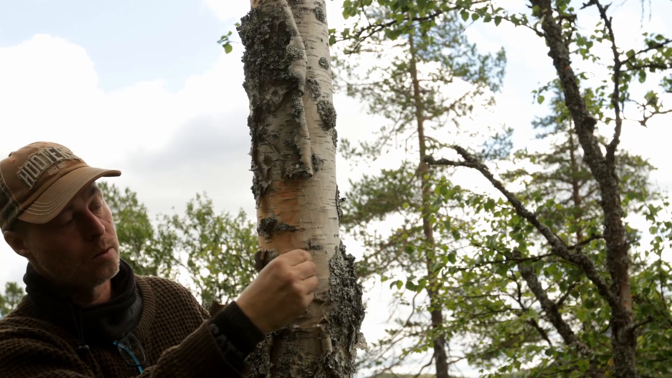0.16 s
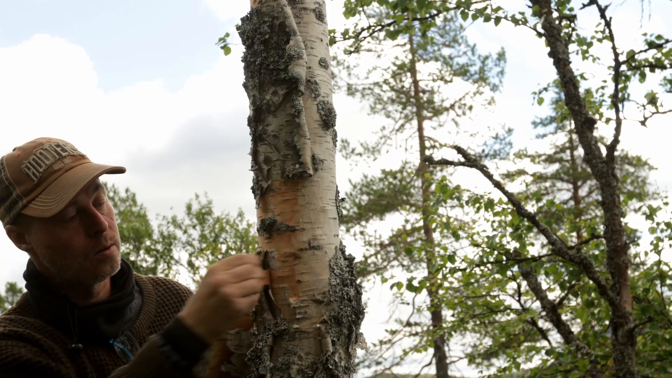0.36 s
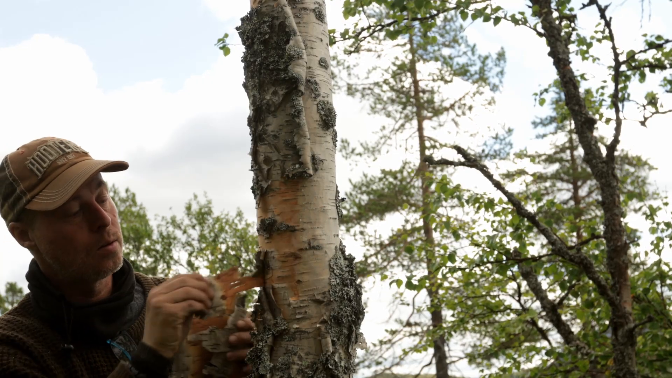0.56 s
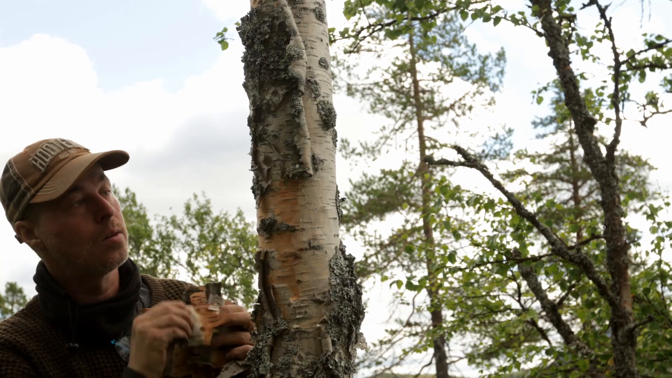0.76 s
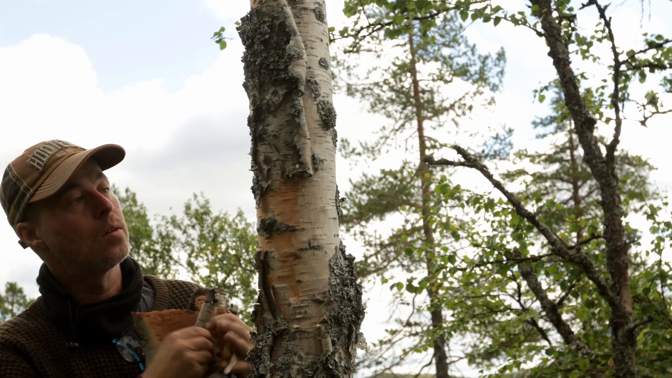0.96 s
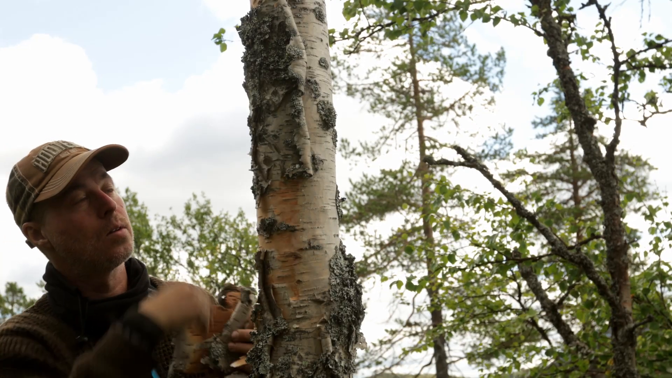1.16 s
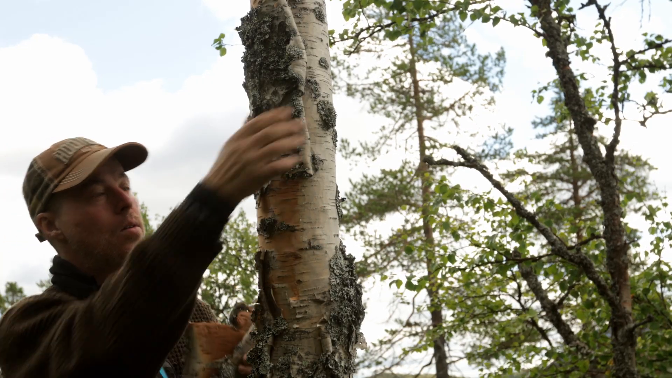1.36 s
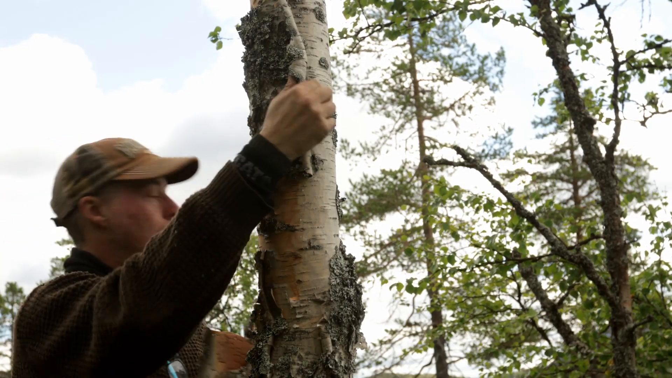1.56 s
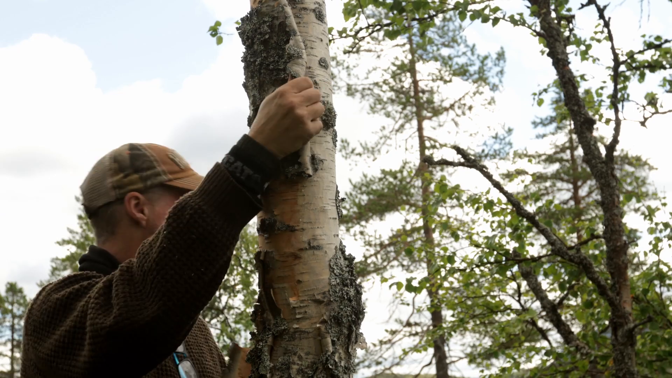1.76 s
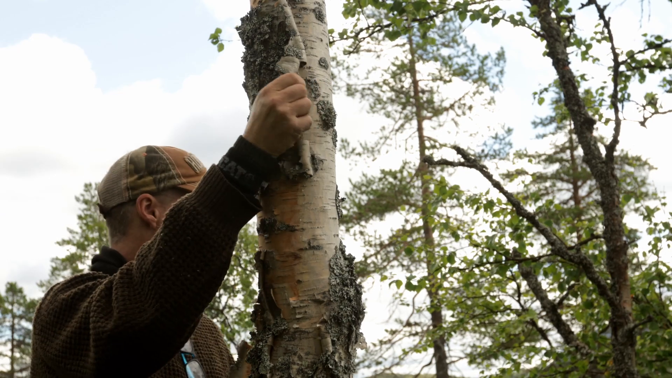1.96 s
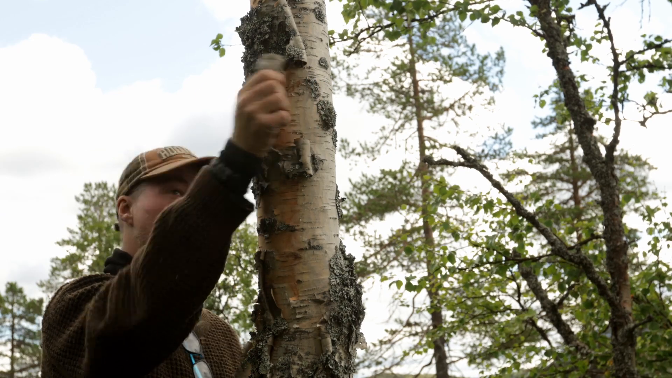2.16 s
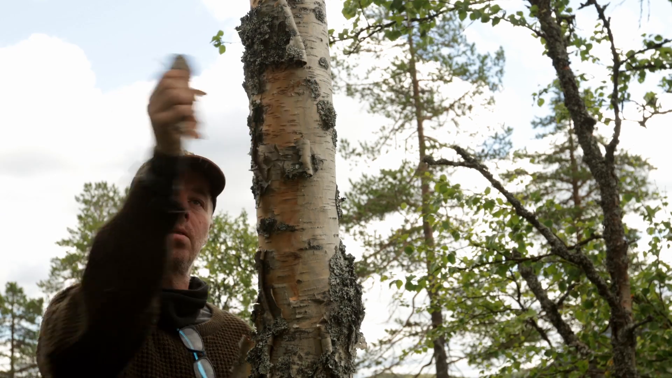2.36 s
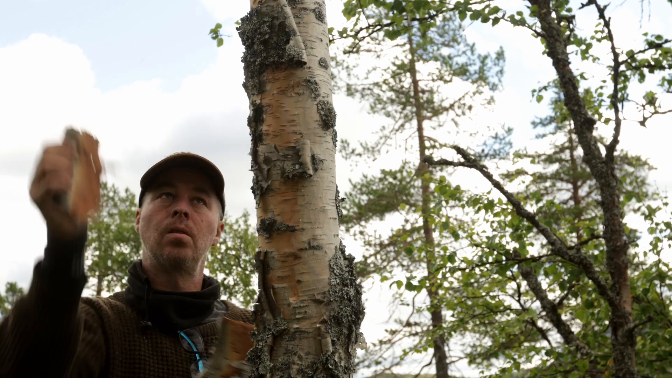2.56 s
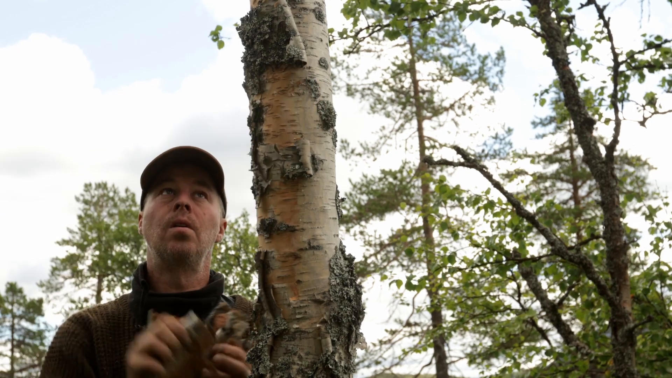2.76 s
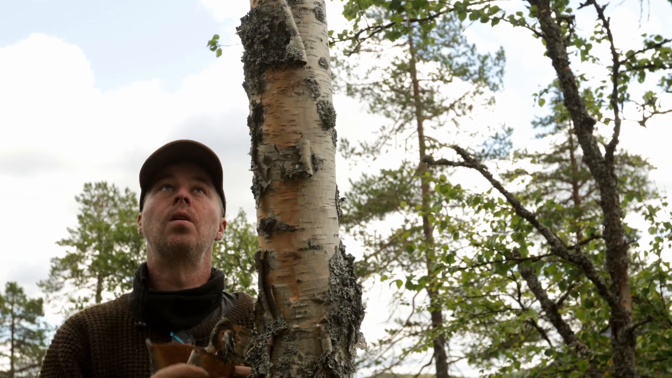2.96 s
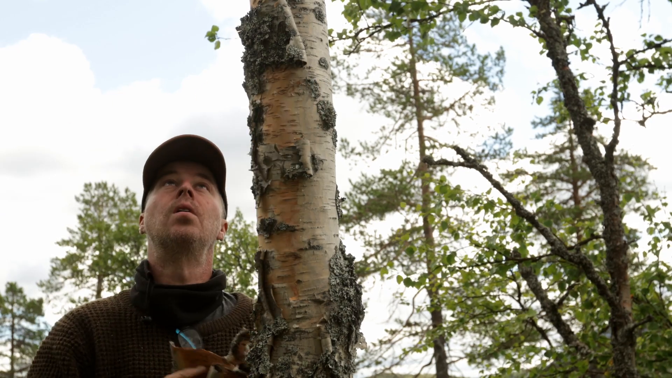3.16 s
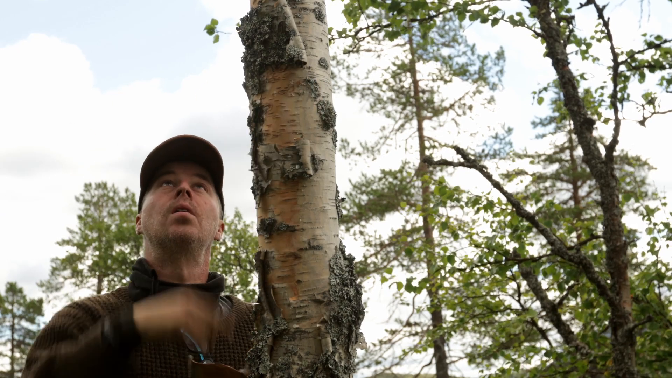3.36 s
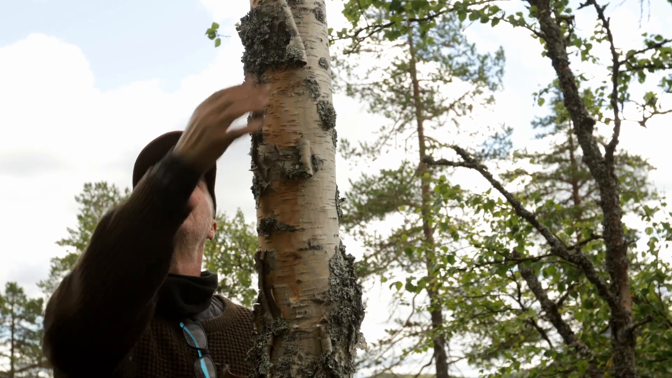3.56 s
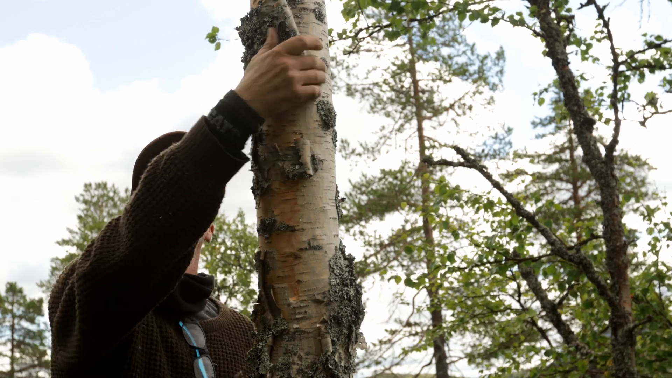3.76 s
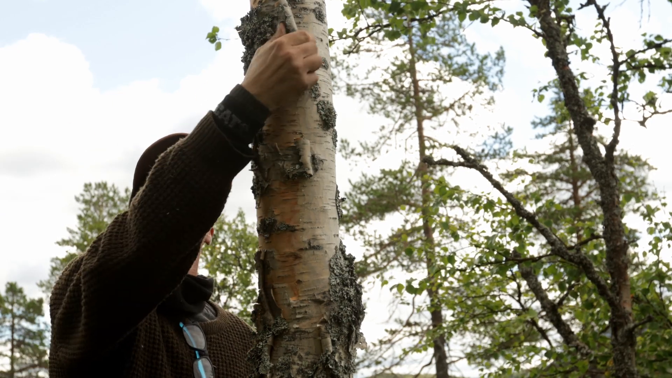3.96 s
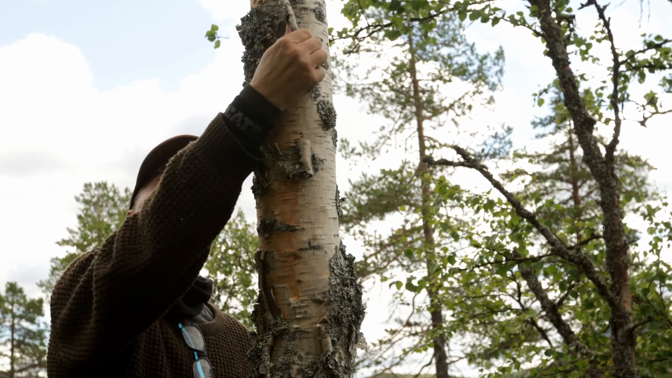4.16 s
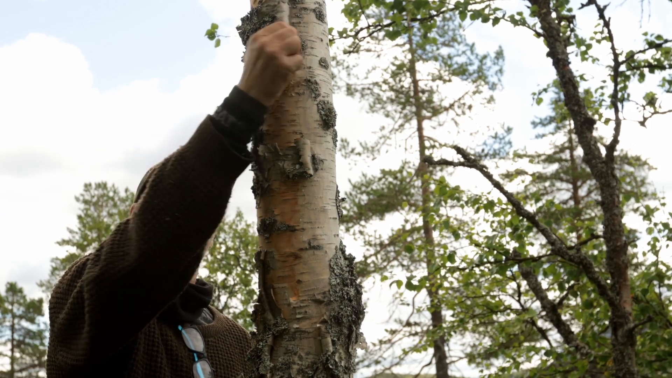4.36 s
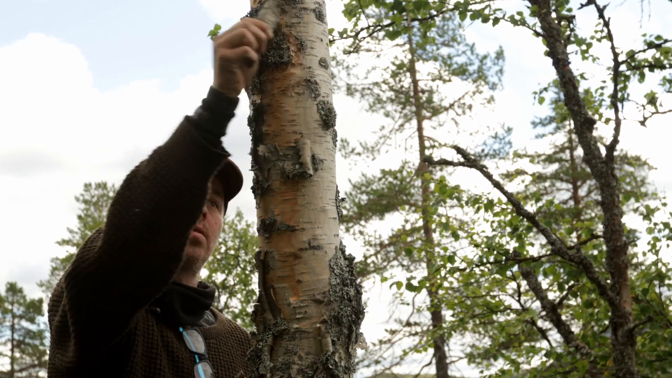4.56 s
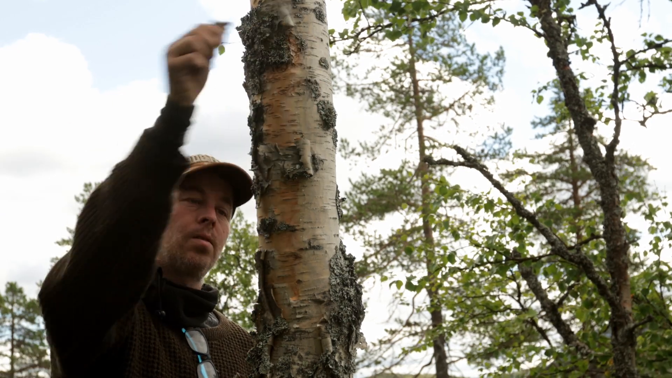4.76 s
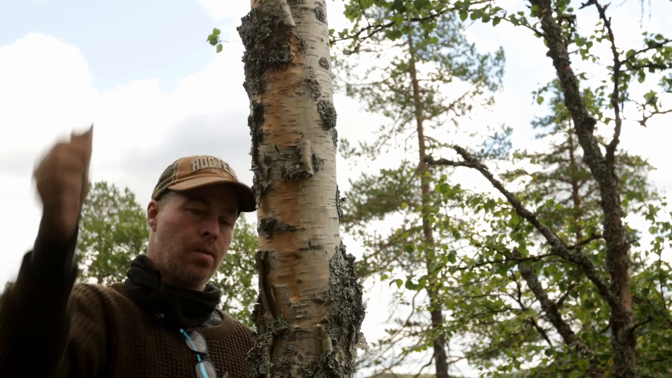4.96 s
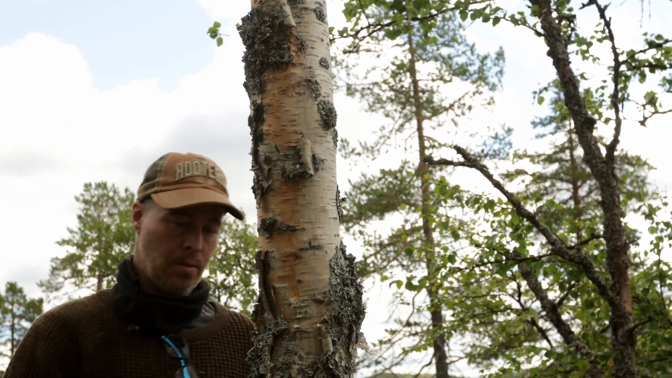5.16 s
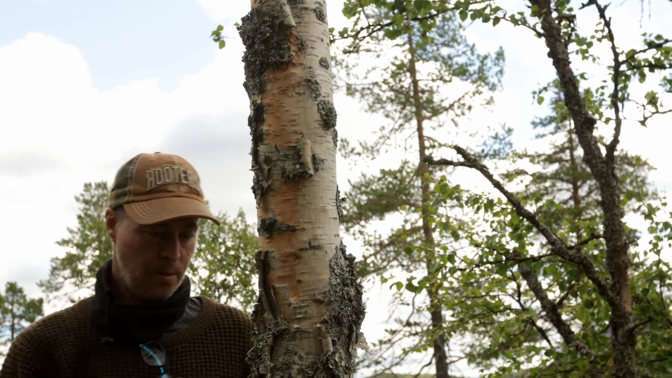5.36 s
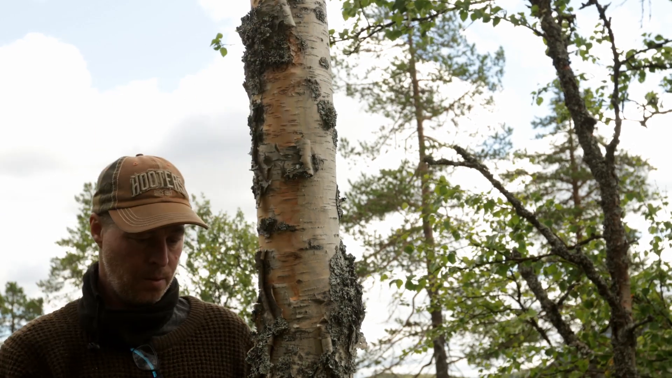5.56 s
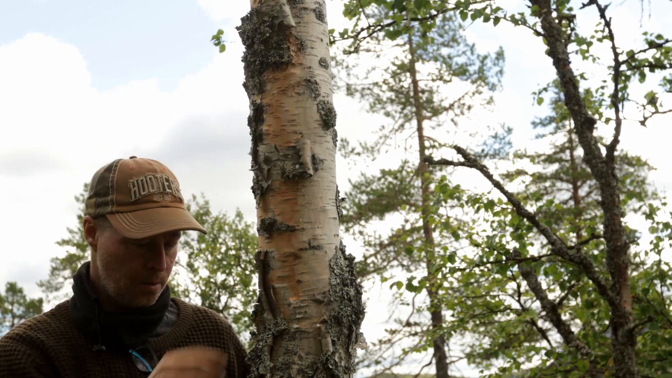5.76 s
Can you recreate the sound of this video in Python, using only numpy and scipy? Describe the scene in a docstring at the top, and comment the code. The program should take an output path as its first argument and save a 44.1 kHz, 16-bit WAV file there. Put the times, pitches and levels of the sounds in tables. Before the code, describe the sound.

Close up outdoors, hands peel dry birch bark. A dense crackling rip opens, thins to rustling, then harsh tearing bursts hit around two seconds. Quiet handling follows, with another strong tear after four seconds, then only soft rustles. Low wind buffets the microphone; the loudest snaps overload slightly.

```python
"""Peeling dry birch bark

Bark is peeled off a trunk by hand in a forest. Breaking fibre bonds give bursts of sharp snaps, each a tick,
a noisy crack, a damped ring and a thud; finger strokes rustle as clumped grains and friction hiss shaped by
the sheet. Filtered noise gives the light wind rumbling on the microphone and the hiss of far leaves. The
loudest snaps overload the recorder."""
import sys
import numpy as np
from scipy import signal
from scipy.fft import rfft, irfft, next_fast_len
from scipy.io import wavfile
from scipy.ndimage import uniform_filter1d, map_coordinates

SR = 44100
rng = np.random.default_rng(int(sys.argv[2]) if len(sys.argv) > 2 else 0)


def file_out(sig):
    """Save sig as 16-bit WAV at sys.argv[1]."""
    # one column per channel
    cols = np.atleast_2d(sig).T
    # limit, then scale
    lim = np.clip(cols, -1, 1)
    pcm = np.round(lim * 32767).astype(np.int16)
    wavfile.write(sys.argv[1], SR, pcm)


N = 256220

# Wind rumble: (time [s], relative level [dB])
WIND_LEVEL = [(0,-52.5),(.37,-53),(.5,-61),(.86,-54),(1.12,-57.5),(1.57,-48),(1.75,-48),(1.91,-53.5),(2.07,-49.5),(2.46,-52),(3.06,-44),(3.2,-50.5),(3.5,-50.5),(3.75,-59),(4.06,-50.5),(4.37,-47.5),(5.13,-45.5),(5.7,-45),(5.81,-50)]
# Spectrum of the wind rumble: (frequency [Hz], gain [dB])
RUMBLE_SPECTRUM = [(12, -45), (20, -13), (83, 0.5), (103, 1.5), (207, -6), (348, -17.5), (386, -20),
                   (441, -19.5), (700, -24.5), (910, -66), (1540, -120)]
# Spectrum of the far leaves: (frequency [Hz], gain [dB])
LEAF_SPECTRUM = [(180, -48), (300, -16.5), (337, -2.5), (470, -9.5), (555, -9), (842, -10), (1030, -11),
                 (1610, -25), (3700, -27), (16000, -54)]
# Finger strokes on the sheet: (start [s], length [s], first relative level [dB], last relative level [dB],
# relative brightness [dB], relative hollow scrape [dB])
FINGER_STROKES = [(0.018,0.062,-49,-48,-11,-7.5),(0.097,.1,-48,-41,-7,-17),(0.203,0.084,-46,-50.5,-0.5,-9),(0.299,0.075,-41,-34.5,-3,-7.5),(.38,0.081,-47,-54,-4.5,-12),
                  (0.453,0.088,-41.5,-38,-1.5,-5.5),(0.557,0.089,-49,-43,-0.5,-11),(0.642,0.11,-32.5,-45.5,0,-10),(0.769,0.055,-47,-45.5,-4.5,-3),(0.849,0.17,-48,-37.5,-1,-1.5),
                  (1.032,0.076,-44,-47.5,-1,-2.5),(1.115,0.097,-43,-46,-2.5,-2.5),(1.179,0.029,-42.5,-36.5,-4,-4),(1.217,0.1,-58,-65,-6,-4),(1.472,0.055,-59,-66,-4,-14),(1.545,0.033,-42.5,-46.5,0,-15),(1.582,0.072,-44,-51,2,1),(1.659,0.048,-47,-57.5,-3,1.5),(1.71,.08,-55,-57,-5,-2),
                  (1.78,0.12,-50,-44,0.5,1),(1.916,0.064,-40,-43,-2,-8),(1.993,0.2,-49.5,-49.5,4,-2.5),(2.2,0.05,-36.5,-31,2,-1.5),(2.261,0.018,-39,-44.5,4.5,-14),
                  (2.297,0.056,-42,-49.5,5.5,-18),(2.368,0.016,-34,-47,4,-4),(2.4,0.14,-61,-66,-3.5,-5),(2.54,0.12,-61,-59,-3,-7),(2.678,0.068,-55,-57,-2,-7),(2.802,0.089,-60,-56,-5,-6),(2.878,0.049,-37.5,-43,-2.5,0),(2.932,0.069,-44,-46.5,-1.5,-5.5),(3.008,0.1,-44,-37.5,-6,-6.5),
                  (3.134,0.028,-43,-37.5,-7,-4.5),(3.17,.06,-51,-53.5,-5,-9),(3.233,0.13,-48,-49.5,-5,-4),(3.373,0.026,-49.5,-38.5,-3.5,-10),(3.434,0.32,-65,-65.5,-3,-4),(3.769,0.062,-52,-45,5.5,-3),
                  (3.857,0.04,-52.5,-45.5,-1.5,1),(3.941,0.084,-57.5,-46,-2.5,0.5),(4.045,0.13,-63,-49,-0.5,0),(4.192,.12,-55,-42.5,-1.5,-3),(4.297,0.052,-42,-49.5,5,-12),
                  (4.363,0.098,-55,-47,1,-6),(4.47,.05,-63,-63,2,-10),(4.518,0.055,-52,-48,-1,-12),(4.584,0.099,-41,-43,1.5,-20),(4.702,0.06,-49,-42.5,3.5,-14),(4.777,0.032,-35.5,-43.5,3,-8),(4.818,.04,-58,-57,3.5,-11),
                  (4.988,.03,-52.5,-54,-2,-1.5),(5.031,0.076,-49,-48,-1.5,-9),(5.148,0.12,-55.5,-57.5,-2.5,-7.5),(5.297,0.072,-59,-56,-6.5,-6),(5.388,0.041,-52.5,-46,-5,-8),(5.439,0.12,-51.5,-45,-2,-10.5),(5.57,0.064,-49,-52.5,-4,-10),(5.631,0.077,-50,-48.5,-3.5,-10.5),(5.702,0.12,-54.5,-64.5,-2,-6)]
# Spectrum of the rustling sheet: (frequency [Hz], gain [dB])
SHEET_SPECTRUM = [(240, -30.5), (400, -5), (666, -8), (777, -3), (839, -6.5), (1420, -15.5), (2120, -7),
                  (2510, -8.5), (3020, -6), (3580, -3), (3810, 0.5), (4380, -12), (13500, -23),
                  (15300, -22.5), (16000, -14)]
# Clear snaps: (time [s], relative level [dB], pitch of the freed patch [Hz], relative tick level [dB],
# relative thud level [dB])
BARK_SNAPS = [(.04,-28,2950,-28,-13),(.1102,-27,2680,-25,-24),(.1516,-31,3120,-18,-32),(.183,-23,3180,-17,-35),
              (.229,-19,1140,1.5,-17),(.2566,-38,3380,9,-28),(.2857,-32,3060,4,-31),(.2975,-25.5,2730,8,-29),(.303,-11.5,3520,0,-40),(.306,-17,3230,3,-31),(.3094,-17,3420,-7,-29),(.3207,-22,2800,-9,-32),
              (.3292,-19.5,2680,4,-15),(.3375,-11.5,3170,-3.5,-17),(.3543,-23,2340,4,-19),(.3603,-21.5,1240,-10,-13),(.369,-17.5,3800,-2,-15),
              (.3837,-33,3920,11,-33),(.3977,-36,4180,8,-20.5),(.4312,-40,3320,5,-21.5),(.4552,-30.5,3200,12,-13.5),(.4617,-29,2930,-18,-4.5),
              (.4658,-23.5,2730,-16,-8),(.4707,-20,1980,0,-15),(.481,-24,1290,8,-6),(.4918,-9.5,3580,-7,-14),(.4962,-16,3370,-6,-35),
              (.4988,-11,3380,-4,-13),(.5102,-10.5,3360,10,-18),(.5215,-3.5,3900,5.5,-16),(.5289,-12,4000,-16,-18),(.5327,-9.5,1940,-3,-9.5),
              (.5449,-23,3140,-1,-20),(.6391,-15.5,2030,7,-18.5),(.6445,-23,3700,1,-6),(.6476,-21.5,1950,-13,-7),(.6539,-16,3340,4.5,-13),
              (.6608,-24,3120,5,-14),(.6763,-17.5,2080,5,-8),(.7296,-26,2440,0,-4.5),(.7338,-23.5,1500,-20,-7),(.754,-25.5,3290,11,-7),
              (.7993,-26,3950,2,-9),(.8202,-28.5,1330,-17,-8),(.8406,-25.5,1350,-5.5,-15),(.856,-28,2450,-18,-29),(.8905,-26,3630,-8,-7.5),
              (.9014,-26.5,3760,1.5,-29),(.929,-29,3700,-1,-26),(.9545,-24.5,2520,3,-28),(.967,-19.5,2620,-13,-23),(.976,-20,2720,-1,-17),(.9867,-20,2690,0,-17.5),(1.0009,-12,1730,-13,-17),
              (1.0313,-23,3120,-17,-20),(1.106,-21,1960,-4.5,-16),(1.1983,-16.5,2300,-3.5,-15.5),(1.2447,-40,2300,-14,-7),(1.2956,-39,2780,-5,-25),(1.4767,-45,3400,10,-24),(1.5459,-26,3480,-6,-30),(1.6093,-32,3540,-9,-28),(1.7504,-40,1590,6,-19),(1.7578,-34,2950,3,-28),
              (1.799,-24.5,1470,-16,-37),(1.8162,-18.5,2840,-7,-39),(1.8468,-25,2780,-19,-28),(1.8662,-17,3030,-4.5,-33),(1.8825,-23,2850,-8,-22),
              (1.911,-22,2670,-2,-30),(1.9177,4,1500,-9.5,-41),(1.92,-14,1550,-18,-8),(1.9315,0,1850,-18,-34),(1.9354,-11,2000,-16,-41),
              (1.9506,-19,1570,-7,-18),(1.9983,-5.5,1880,-23,-44),(2.016,-5,2100,-2.5,-47),(2.0173,-11,1560,-17,-33),(2.0432,-8,2780,-0.5,-30),
              (2.086,-6.5,1380,-8.5,-28),(2.0907,-21,1610,-18,-38),(2.0992,-10,1500,-27,-41),(2.1131,-13.5,3500,6,-19),(2.1269,-22,3060,8,-35),
              (2.1638,-20.5,3250,11,-15),(2.2014,-15,1100,-7,-22),(2.2045,-9,1540,-9,-15),(2.2067,-11.5,3000,8,-22),(2.2113,-16,3300,2,-12),
              (2.2188,-5.5,3220,-18,-29),(2.2315,-9,2850,-13,-15),(2.2366,-16,1550,-2,-6.5),(2.2412,-14,3400,-13,-12),(2.2448,-20,3100,-6,-14),
              (2.261,-9,3770,-3,-18),(2.2714,-21,3210,-4,-5),(2.2937,3,3630,-9,-42),(2.296,-9.5,2720,-9,-38),(2.302,-19,3340,3,-12.5),
              (2.306,-24,3810,3,-35.5),(2.3142,-6.5,3710,-2,-30),(2.3185,-21,3510,5.5,-22),(2.3261,-18,3270,2,-43),(2.332,-5.5,3080,-9,-41),
              (2.3377,-13.5,3700,6.5,-21),(2.3625,3.5,2060,-5,-21),(2.3662,-7.5,3340,-7,-10.5),(2.537,-29,3500,-25,-28),(2.7223,-37,2820,-16,-21),(2.7412,-44,2070,6,-23),(2.8102,-40,3500,-16,-21),(3.0487,-29,3570,-17,-20),(3.1103,-23.5,3400,-10,-6.5),
              (3.1413,-22.5,3530,-18,-11),(3.2356,-24,2190,-4,-24),(3.2626,-32,3790,-1,-22),(3.279,-26,3240,-9,-15),(3.297,-22,2520,-5.5,-10.5),(3.5478,-39,3700,-8,-13.5),
              (3.7799,-29,3430,6,-6),(3.7968,-21,3400,-8,-13),(3.8171,-13,3580,-8,-29),(3.879,-29,3100,-14,-23),(4.1473,-35.5,1250,5,-26),(4.2008,-34,3320,-4,-21),(4.2125,-32,3350,-13,-14),(4.237,-27,1680,-18,-20),
              (4.261,-26,3730,3,-30),(4.2769,-20,3660,-2.5,-40),(4.2845,-23,1640,-20,-31),(4.2995,-29,3470,-6,-28),(4.303,-0.5,1550,-13,-23),
              (4.307,1.5,3410,-14,-29),(4.3104,-16,1550,-16,-22),(4.3172,-28,2510,-9,-22),(4.344,-26.5,2320,0,-32),(4.3661,-28,3250,0,-12),
              (4.39,-37,3560,-14,-20),(4.4175,-30.5,2510,6,-23),(4.4484,-22,2080,-2.5,-30),(4.4658,-30.5,3120,8,-24),(4.5058,-40,3920,9,-15),(4.5241,-34,3400,0,-18),(4.5444,-18,3630,-4,-22),(4.5813,-9,2730,-22,-37),
              (4.6003,-7,3100,-17,-30),(4.607,-20,3730,3,-35),(4.6252,-6.5,3750,-4,-26),(4.6326,-14,3450,-3,-42),(4.6425,-11,3460,6,-16),
              (4.6555,-15.5,3770,-5,-31),(4.6622,-16,3640,-1,-17.5),(4.6741,-21,3640,2,-31),(4.6993,-9.5,3330,3.5,-15.5),(4.7266,-29,3700,-7,-7),
              (4.7699,-19,3470,9,-35),(4.7793,-8.5,2360,.5,-13),(4.7815,-19,2130,6.5,-18),(4.7844,-10.5,4380,-10,-26),(4.7961,-16.5,3340,5,-14),
              (4.8068,-26,3800,5,-16),(4.8494,-43,3320,7.5,-19),(4.93,-42,3070,-21.5,-1.5),(4.996,-33,3850,2.5,-22),(5.1664,-31,3600,-16,-10),(5.3205,-36.5,2550,-5,-6),(5.353,-39,1820,-7,-16),
              (5.3946,-35,2550,4,-9),(5.567,-34,2690,6,-24),(5.5831,-24.5,3620,-11,-35)]
# Spectrum of the broadband part of a snap: (frequency [Hz], gain [dB])
CRACK_SPECTRUM = [(180, -41), (300, -18.5), (486, -33.5), (701, -5), (870, 2), (1900, 6.5), (3700, 9.5),
                  (4520, 1.5), (10000, -2), (14000, -44), (16000, -34.5)]
# Answer of trunk, arm and body: (frequency [Hz], 60 dB decay time [s])
NEAR_DECAY = [(300, 0.12), (2000, 0.021), (12000, 0.015)]

LEAVES_DB = -61.5
RISE_S, FALL_DB_PER_S = 0.0076, 902  # every stroke sets in quickly and dies away
REST_DB, REST_BRIGHT_DB, REST_HOLLOW_DB = -65, 0, -3.5  # the sheet at rest, on the scales of the strokes
DULL_DB, DULL_REF_DB, DULL_GROWS = -60, -49.5, 0.55  # dull rub at the reference rustle; dB per dB of rustle
SMALL_PER_S, SMALL_DB, SMALL_SPREAD_DB = 49, 8.5, 2  # chance snaps: rate, level over the stroke level, scatter
SMALL_HZ, SMALL_TICK_DB, SMALL_THUD_DB = 3170, -5, -23.5  # their centres, on the scales of the clear snaps
DECAY_S, DECAY_REF_HZ, DECAY_REF_DB = 0.0063, 2500, -12.5  # base decay time of a snap of this pitch and level
PITCH_EXPONENT, SHORTER_DB_PER_DB = 0.47, 0.15  # higher patches die sooner; harder breaks are shorter
TOP_HZ = 15800


def amp(db):
    """Logarithmic level: decibels to amplitude gain."""
    return 10 ** (np.asarray(db) / 20)


def unit(x):
    """Power normalisation: x scaled to rms 1."""
    return x / np.sqrt(np.mean(x ** 2) + 1e-20)


def peak_one(rows):
    """Peak normalisation: each row scaled to peak 1."""
    return rows / np.abs(rows).max(axis=1, keepdims=True)


def along(points, hz):
    """Logarithmic interpolation: (frequency, value) points read at hz."""
    f, v = np.transpose(points)
    return np.interp(np.log(hz + 1), np.log(f + 1), v)


def curves(rows):
    """Linear interpolation: one value per sample for each column after the time."""
    times, *columns = np.transpose(rows)
    return [np.interp(np.arange(N) / SR, times, c) for c in columns]


def wobble(rate):
    """Smooth random fluctuation: a spline through Gaussian knots, rate of them a second."""
    knots = rng.standard_normal(int(N * rate / SR) + 4)
    return map_coordinates(knots, [np.arange(N) * rate / SR])


def filtered(x, response):
    """Linear filtering: the spectrum of x times a response of frequency, along the last axis."""
    n = x.shape[-1]
    padded = next_fast_len(2 * n if n < SR else n + SR // 2)
    return irfft(rfft(x, padded) * response(np.fft.rfftfreq(padded, 1 / SR)), padded)[..., :n]


def coloured(x, spectrum):
    """Minimum-phase filtering: the folded cepstrum gives a causal filter of the given shape."""
    size = 4096
    gain = amp(along(spectrum, np.fft.rfftfreq(size, 1 / SR)))
    cepstrum = irfft(np.log(gain + 1e-6))
    cepstrum[1:size // 2] *= 2
    cepstrum[size // 2 + 1:] = 0
    kernel = irfft(np.exp(rfft(cepstrum)))
    kernel = kernel.reshape((1,) * (x.ndim - 1) + (-1,))
    return signal.fftconvolve(x, kernel, axes=-1)[..., :x.shape[-1]]


def band(x, lo_hz, hi_hz):
    """Butterworth filtering: a causal band-pass."""
    return signal.sosfilt(signal.butter(2, [lo_hz, hi_hz], "bandpass", fs=SR, output="sos"), x)


def part(x, lo_hz, hi_hz):
    """Spectral division: x within a soft-edged slice of frequency."""
    below = lambda f, hz: 1 / (1 + (f / (hz + 1e-6)) ** 12)
    return filtered(x, lambda f: below(f, hi_hz) - below(f, lo_hz))


def placed(rows, times):
    """Superposition: the sum of the rows, each starting at its time."""
    at = np.round(times * SR).astype(int)[:, None] + np.arange(rows.shape[1])
    return np.bincount(at.ravel(), rows.ravel(), N + SR)[:N]


def air():
    """Turbulent pressure: lumpy low noise of wind on the capsule, with a smooth hiss of far leaves."""
    rumble_db, = curves(WIND_LEVEL)
    lumps = amp(1.2 * wobble(9) + 1.3 * wobble(25))
    rumble = unit(lumps * coloured(rng.standard_normal(N), RUMBLE_SPECTRUM))
    leaves = unit(amp(1.2 * wobble(4)) * coloured(rng.standard_normal(N), LEAF_SPECTRUM))
    return amp(rumble_db + 2.5) * band(rumble, 32, 900) + amp(LEAVES_DB) * leaves


def hands():
    """Power addition: strokes over the resting sheet set level and power-weighted brightness and hollowness."""
    columns = (c[:, None] for c in np.transpose(FINGER_STROKES))
    start, length, first_db, last_db, bright_db, hollow_db = columns
    control_s = np.arange(0, N, 32) / SR
    t = control_s - start
    db = first_db + (last_db - first_db) * np.clip(t / length, 0, 1)
    db = db - FALL_DB_PER_S * np.maximum(t - length, 0)
    onset = np.clip(t / RISE_S + 1, 0, 1)  # the rise ends at the start time
    power, rest = (amp(db) * onset) ** 2, amp(2 * REST_DB)
    total = power.sum(axis=0) + rest
    share = lambda db, rest_db: ((power * db).sum(axis=0) + rest * rest_db) / total
    bright, hollow = share(bright_db, REST_BRIGHT_DB), share(hollow_db, REST_HOLLOW_DB)
    return curves(np.transpose([control_s, 10 * np.log10(total), bright, hollow]))


def patchy(x, patchy_db):
    """Time-varying filtering: the sheet bends, so random patches of gain keep shifting its colour."""
    z = signal.stft(x, nperseg=256)[2]
    field = uniform_filter1d(rng.standard_normal(z.shape), size=4, axis=0)  # smooth in frequency
    field = uniform_filter1d(field, size=12, axis=1)  # smooth in time
    return signal.istft(z * amp(patchy_db * unit(field)), nperseg=256)[1][:N]


def rustle_grains():
    """Clustered random impulses: countless tiny breaks, each a damped sine and a noise tick."""
    chance = rng.random(N) < 700 / SR * amp(4 * wobble(30))  # the breaks come in clumps
    s = np.flatnonzero(chance) / SR
    size_db = np.minimum(4.7 * rng.exponential(size=(len(s), 1)), 14)
    pitch = rng.standard_normal((len(s), 1))
    hz = np.clip(3000 * np.exp(.5 * pitch), 600, 12000)
    t = np.arange(256) / SR
    flake = np.sin(2 * np.pi * hz * t) * np.exp(-hz * t / 5.0)  # a flake rings a few cycles
    tick = 1.4 * rng.standard_normal((len(s), len(t))) * amp(-60 * t / 0.0053)
    return unit(placed(amp(size_db) * (flake + tick), s))


def rustle():
    """Friction and resonance: uneven grains over a rubbing hiss, both coloured by the sheet."""
    level_db, bright_db, hollow_db = hands()
    dull_db = DULL_DB + DULL_GROWS * (level_db - DULL_REF_DB)  # swings less than the rustle
    hiss = unit(amp(1.5 * wobble(25) + 2.5 * wobble(70)) * rng.standard_normal(N))
    source = amp(-4.5) * rustle_grains() + amp(2) * hiss
    sheet = patchy(coloured(source, SHEET_SPECTRUM), patchy_db=1.4)
    # air between sheet and trunk resonates at 1500 Hz
    cavity = lambda f: 1 + 4.5j * f * 260 / (1500 ** 2 - f * f + 1j * f * 260)
    dull = unit(part(sheet, 0, 1370))
    hollow = unit(filtered(part(sheet, 1100, 1970), cavity))
    middle = unit(part(sheet, 2100, 3640))
    bright = unit(part(sheet, 4400, SR))
    upper = amp(hollow_db - 1.44) * hollow + amp(-2.5) * middle + amp(bright_db + 1.0) * bright
    return amp(dull_db) * dull + amp(level_db) * upper


def small_snaps():
    """Random fracture: chance snaps, as strong as the hand is busy, in the columns of the snap table."""
    count = int(SMALL_PER_S * N / SR)
    s = rng.random(count) * N / SR
    z = np.clip(rng.standard_normal((count, 4)), -2, 2)
    busy_db = hands()[0][(s * SR).astype(int)]
    db = busy_db + SMALL_DB + SMALL_SPREAD_DB * z[:, 0]
    hz = SMALL_HZ * np.exp(.25 * z[:, 1])
    return np.transpose([s, db, hz, SMALL_TICK_DB + 6 * z[:, 2], SMALL_THUD_DB + 6 * z[:, 3]])


def snaps():
    """Brittle fracture: a fibre bond breaks with a tick, a ragged crack, a ringing patch and a dull push."""
    s, db, hz, tick_db, thud_db = (c[:, None] for c in np.vstack([BARK_SNAPS, small_snaps()]).T)
    t = np.arange(1536) / SR
    decay_s = DECAY_S * (DECAY_REF_HZ / hz) ** PITCH_EXPONENT
    decay_s = np.clip(decay_s * amp(-SHORTER_DB_PER_DB * (db - DECAY_REF_DB)), .002, .03)
    noise = rng.standard_normal((len(s), 4, len(t)))
    dying = lambda life: (1 - np.exp(-t / 0.00019)) * amp(-60 * t / life)
    drift = .07 * np.cumsum(noise[:, 0], axis=1)  # rough wood: the phase wanders
    ring = peak_one(np.sin(2 * np.pi * hz * t + drift) * dying(1.07 * decay_s))
    crack_envelope = dying(.5 * decay_s) + amp(-11.0) * dying(2.93 * decay_s)
    crack = coloured(noise[:, 1] * crack_envelope, CRACK_SPECTRUM)
    tick_envelope = dying(0.0024) + amp(-19.5) * dying(0.99 * decay_s)
    tick = peak_one(band(noise[:, 2] * tick_envelope, 4800, 15500))
    # the crack favours the pitch of the freed patch
    patch = lambda f: 1.0 + 1j * f * 0.32 * hz / (hz * hz - f * f + 1j * f * 1.3 * hz)
    crack = peak_one(filtered(crack, patch))
    body = band(amp(-6.0) * ring + amp(-5.0) * crack, 840, 11000)  # too small for bass
    thud = peak_one(band(noise[:, 3] * dying(2.2 * decay_s), 250, 1100))
    snap = band(body, 800, 17000) + amp(tick_db - 3.3) * tick + amp(thud_db - 3.5) * thud
    return placed(amp(db + 2.0) * snap, s[:, 0])


def surroundings(x):
    """Scattering: a very short diffuse answer, each frequency dying at its own speed."""
    hz, t, z = signal.stft(rng.standard_normal(SR // 4), SR, nperseg=128)
    decay = amp(-60 * t / along(NEAR_DECAY, hz)[:, None])
    tail = signal.istft(z * decay, SR, nperseg=128)[1]
    delayed = np.pad(x, (90, 0))  # about 2 ms
    return signal.fftconvolve(delayed, tail / np.linalg.norm(tail))[:N]


def scene():
    """Superposition: bark close by, in open air."""
    bark = snaps()
    return (air() + rustle() + bark + amp(-18) * surroundings(bark))[None]


def record(dry):
    """Saturation: a sharp bend into full scale, then the band limit."""
    clipped = dry / (1 + np.abs(dry) ** 8) ** (1 / 8)
    return filtered(clipped, lambda hz: 1 / (1 + (hz / TOP_HZ) ** 120))


dry = scene()
out = record(dry)
file_out(out)
```